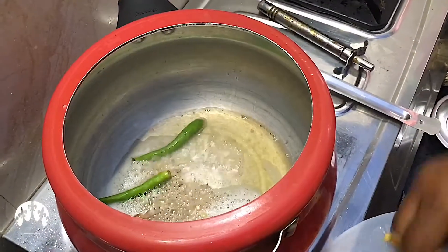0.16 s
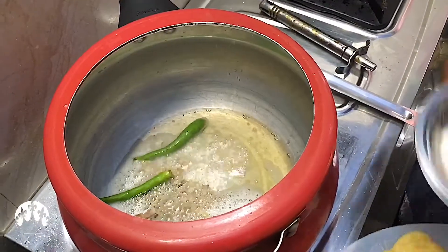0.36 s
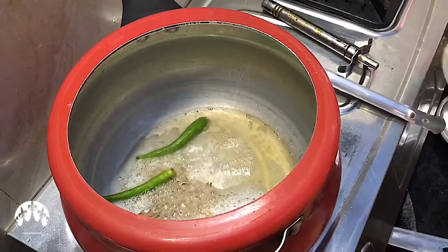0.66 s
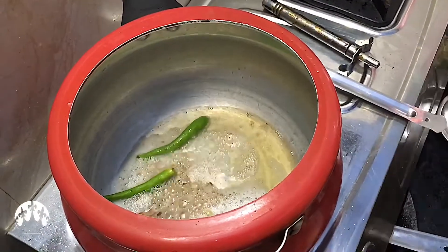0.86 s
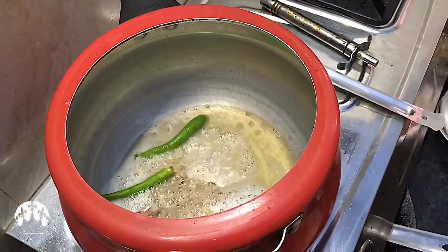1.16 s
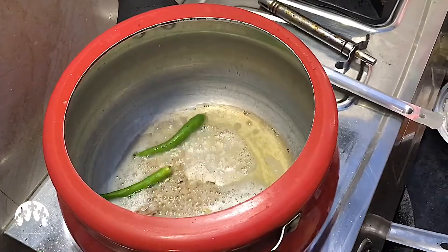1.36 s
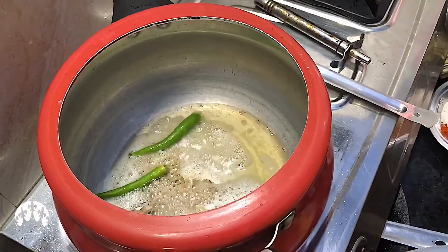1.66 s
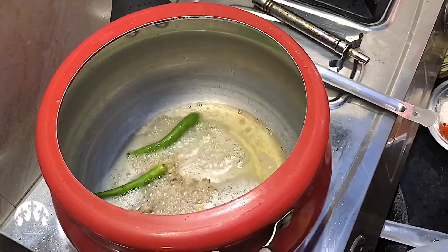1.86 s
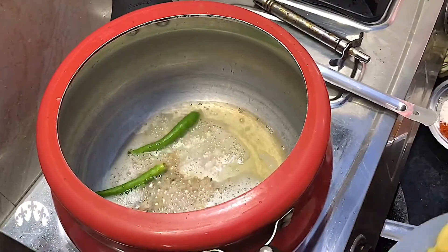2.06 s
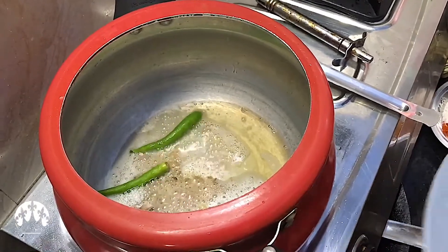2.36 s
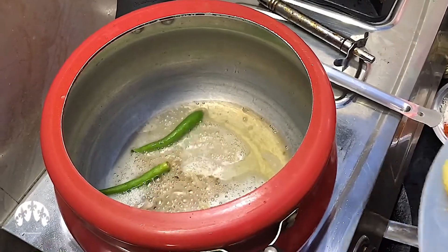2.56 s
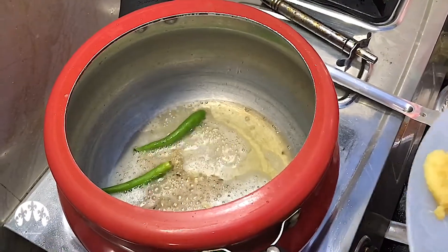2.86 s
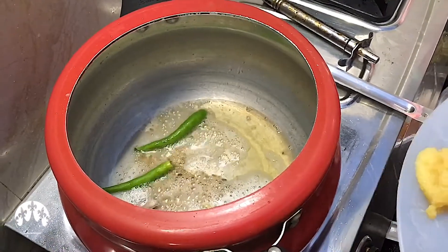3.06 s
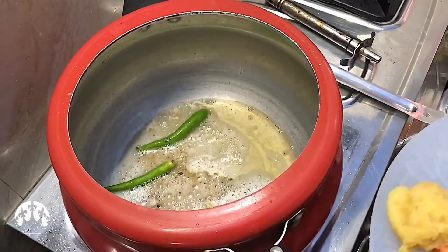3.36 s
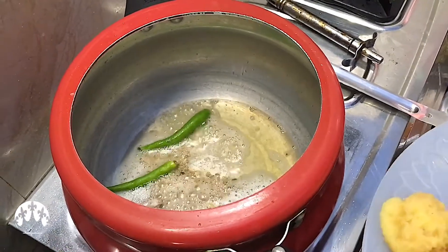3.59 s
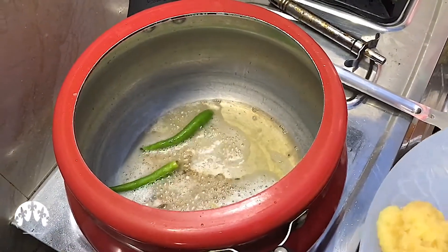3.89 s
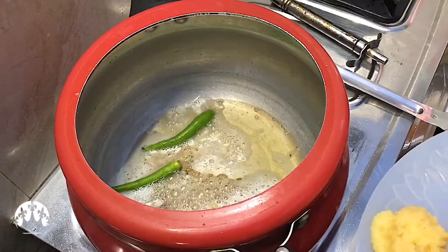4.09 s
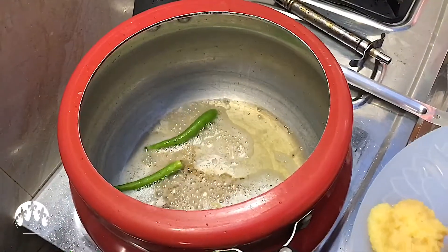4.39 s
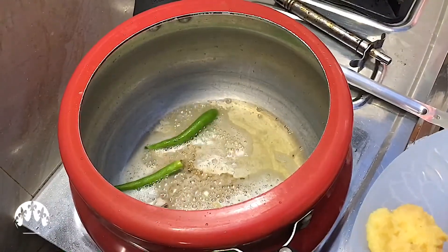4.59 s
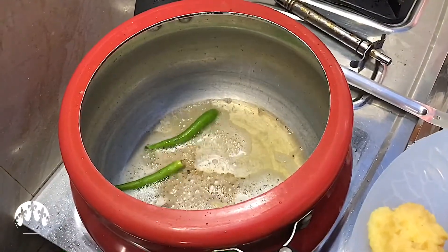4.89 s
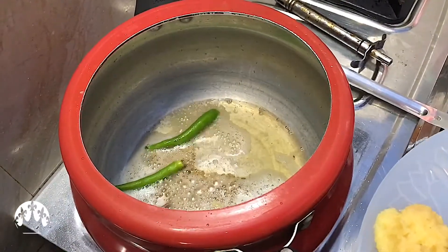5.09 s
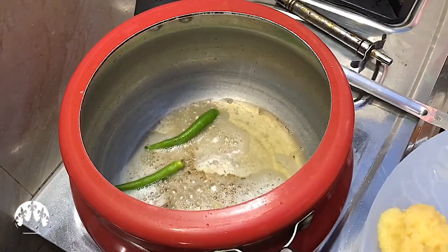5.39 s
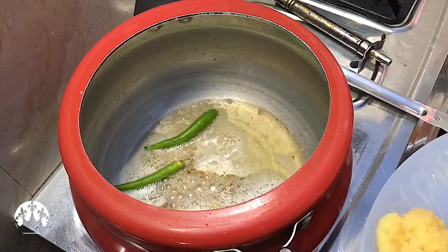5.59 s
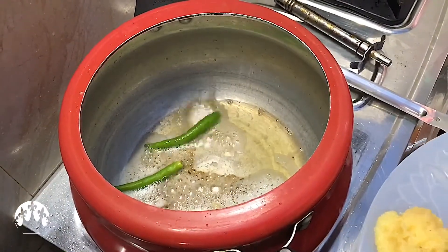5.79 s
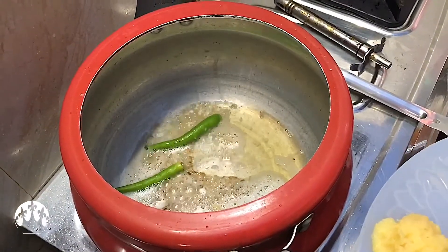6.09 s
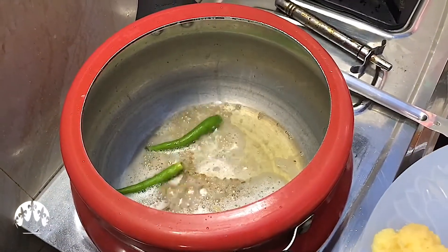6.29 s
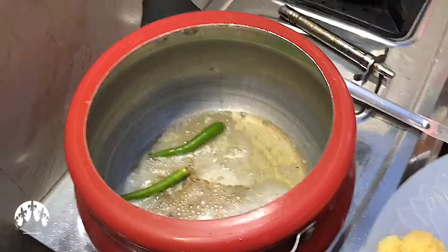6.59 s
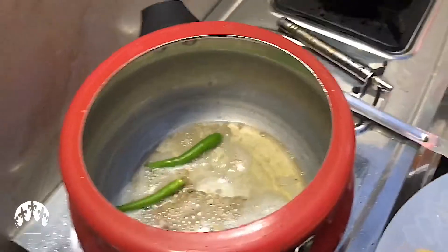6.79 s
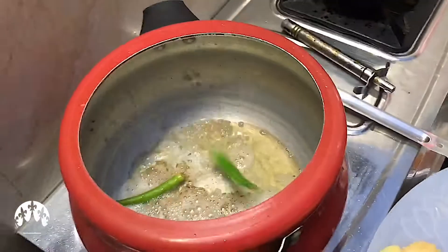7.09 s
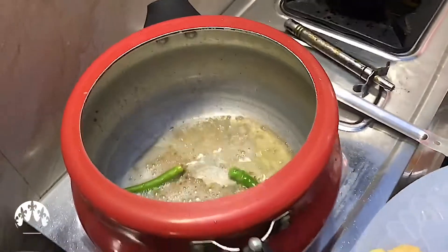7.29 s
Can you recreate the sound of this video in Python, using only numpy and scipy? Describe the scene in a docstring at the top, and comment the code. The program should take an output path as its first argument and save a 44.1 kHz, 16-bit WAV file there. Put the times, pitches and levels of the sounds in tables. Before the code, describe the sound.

Close, bright frying fizz full of snaps and round plips slowly dries out; a chilli pops with a tiny squeal, then another bursts and jumps.

```python
"""In a kitchen, green chillies and whole spices fry in hot oil in an open pressure cooker, heard just above the rim.
Boiling water makes a dense fizz of random clicks and small rings, with sharp noise spits and round plips,
thinning as the spices dry. Twice a chilli bursts: first steam squeals out and juice revives the sizzle, then it
jumps across the pot. Filters make the pot ring, a noise tail and low notes are the kitchen, a dish scrapes and
knocks, a gas flame murmurs, and the loudest pops overload."""
import sys
import numpy as np
from scipy import signal
from scipy.fft import rfft, irfft
from scipy.io import wavfile

SR = 44100
rng = np.random.default_rng(int(sys.argv[2]) if len(sys.argv) > 2 else 0)


def store_pcm(level_fs):
    """Save levels as 16-bit WAV."""
    pcm = np.round(np.clip(level_fs, -1, 1) * 32767).astype(np.int16)
    wavfile.write(sys.argv[1], SR, np.atleast_2d(pcm).T)


N = 328456
TIME = np.arange(N) / SR

# In all tables and settings, t60 is the time in seconds to fade by 60 dB.
# The two chilli bursts. Each row: start in seconds, level of the crack in dB, pitch in Hz, t60 in seconds,
# level of the puff in dB.
BURST_EVENTS = [(5.6505, -7, 1880, 0.018, -11), (6.832, -6.5, 1670, 0.048, -9.5)]
# Colour of the bright bubbling and cracks. Each row: frequency in Hz, relative level per Hz in dB.
FIZZ_COLOUR = [(300, -20), (800, -17), (1300, -11), (1800, -2), (2500, -0.5), (4000, 2.5), (6500, 5),
               (9000, 1), (11000, 0), (15500, -4.5)]
# Colour of the air pushed by spits and bursts. Each row: frequency in Hz, relative level per Hz in dB.
PUFF_COLOUR = [(25, -15), (60, -7.5), (120, -0.5), (220, -2.5), (400, 2.5), (600, -7.5), (800, -8.5),
               (1100, -12), (2500, -13), (8000, -58)]

# the water in the spices (1 at the start) boils away steadily, down to a last trace
DRY_S, LAST_WATER = 6.6, 0.19
# juice from the first burst: its share of water, how fast it spreads and how slowly it boils off
JUICE, JUICE_SPREAD_S, JUICE_LASTS_S = 0.24, 0.027, 1.8
# bubbles per second at full water; their number falls as this power of the water
SMALL_PER_S, LARGER_PER_S, RATE_POWER = 3300, 170, 0.85
# the treble is raised and the rest lowered by this many dB: always, at the start and after the juice
SETTLED_LIFT_DB, START_LIFT_DB, JUICE_LIFT_DB = 0.1, 1.5, 2.0
START_FINE_S, JUICE_FINE_S = 1.3, 1.8  # fading times of the last two lifts
CRISP_DB_PER_S = 0.36  # the lift grows as the spices dry
FLARE_DB, FLARE_S = 2.5, 0.15  # the sizzle starts with a short flare
FLIGHT_S, FLIGHT_DIP_DB = 0.215, -10.5  # the sizzle drops away while the second chilli is in the air
# lesser spits and plips: number per second, middle level at full water, power of the water that it follows
STRAY_PER_S, STRAY_DB, STRAY_POWER = 10, -12.5, 0.56


def from_db(db):
    """Turn decibels into a gain."""
    return 10 ** (np.asarray(db) / 20)


def rms_one(x):
    """Scale to an average (rms) strength of 1."""
    return x / np.sqrt(np.mean(x ** 2) + 1e-20)


def at_level(sound, db, size=176):
    """Scale a hit so that its first samples have the given rms level."""
    return sound * from_db(db) / np.sqrt(np.mean(sound[:size] ** 2) + 1e-20)


def at_hz(points, hz):
    """Read a table between its points, with frequency on a log scale."""
    f, value = np.transpose(points)
    return np.interp(np.log(np.maximum(hz, 1)), np.log(f), value)


def add(out, s, sound):
    """Mix a short sound in at time s."""
    i = max(0, round(s * SR))
    out[i:i + len(sound)] += sound[:max(0, N - i)]


def since(s):
    """Seconds since s, zero before it."""
    return np.maximum(TIME - s, 0)


def coloured(x, spectrum, size=4096):
    """Filter x to the shape of a spectrum, without delay (minimum phase) and with average power gain 1."""
    gain = rms_one(from_db(at_hz(spectrum, np.linspace(0, SR / 2, size // 2 + 1))))
    # folding the cepstrum forward in time gives the minimum-phase filter
    cepstrum = irfft(np.log(gain))[:size // 2]
    cepstrum[1:] *= 2
    response = irfft(np.exp(rfft(cepstrum, size)))
    return signal.oaconvolve(x, response)[:len(x)]


def band(x, hz, octaves, order=1):
    """Keep a band about hz."""
    low_edge = min(hz / 2 ** (octaves / 2), SR * .4)
    high_edge = min(hz * 2 ** (octaves / 2), SR * .45)
    sos = signal.butter(order, [low_edge, high_edge], "band", fs=SR, output="sos")
    return signal.sosfilt(sos, x + 1e-18)


def resonance(x, hz, octaves):
    """Ring at one pitch (two poles), with gain 1 at the peak."""
    r = np.exp(-np.pi * hz * (2 ** octaves - 1) / SR)
    top = (1 - r * r) / 2 * np.array([1, 0, -1])
    return signal.lfilter(top, [1, -2 * r * np.cos(2 * np.pi * hz / SR), r * r], x)


def clicks(per_s, spread_db, cap):
    """Random clicks, many small and a few large; the division evens out the power as the rate changes."""
    sizes = from_db(spread_db * np.minimum(rng.exponential(1, N), cap)) * rng.choice([-1, 1], N)
    return sizes * (rng.random(N) < per_s / SR) / np.sqrt(per_s)


def rupture(t60, snap, size=2048):
    """A film tears: one sharp snap in a spray of noise that dies away."""
    spray = rng.standard_normal(size) * from_db(-60 * TIME[:size] / t60)
    spray[1] += snap * rng.choice([-1, 1])
    return spray


def swelling(swell_s, size):
    """The rise and fall of a bubble's ring, strongest at swell_s seconds."""
    age = TIME[:size] / swell_s
    return age ** 2 * np.exp(-2 * age)


def water_left():
    """The spices dry out; the first burst wets the oil again."""
    age = since(BURST_EVENTS[0][0])
    juice = JUICE * (1 - np.exp(-age / JUICE_SPREAD_S)) * np.exp(-age / JUICE_LASTS_S)
    return np.maximum(1 - TIME / DRY_S, LAST_WATER) + juice


def fineness():
    """Treble lift in dB: fresh water boils in the finest bubbles, and drying spices turn slowly crisper."""
    age = since(BURST_EVENTS[0][0])
    start = START_LIFT_DB * np.exp(-TIME / START_FINE_S)
    juice = JUICE_LIFT_DB * (age > 0) * np.exp(-age / JUICE_FINE_S)
    return SETTLED_LIFT_DB + CRISP_DB_PER_S * TIME + start + juice


def tilted(x, lift_db, pivot_hz=8000):
    """Finer bubbles sound brighter: lower the part below the pivot and raise the rest."""
    low = signal.sosfilt(signal.butter(1, pivot_hz, fs=SR, output="sos"), x)
    return low * from_db(-lift_db) + (x - low) * from_db(lift_db)


def fizz(per_s, bubble_db=3.0, bubble_octaves=0.28, scatter_t60=0.013, count=20):
    """Tiny ticks, and small bubbles that each ring a few cycles at their own pitch."""
    ticks = rms_one(clicks(4 * per_s, spread_db=6.0, cap=5.5))
    born = clicks(per_s, spread_db=6.5, cap=3.1)
    dealt = rng.integers(0, 20, N)  # which pitch each bubble gets
    pitches = np.geomspace(1700, 15000, 20)
    bubbles = sum(band(born * (dealt == k), hz, bubble_octaves) for k, hz in enumerate(pitches))
    direct = ticks + from_db(bubble_db) * rms_one(bubbles)
    # each part of the pan reaches the ear by its own reflections off the steel wall
    place = rng.integers(0, count, N // 64 + 1).repeat(64)[:N]
    scattered = np.zeros(N)
    for k in range(count):
        path = rms_one(rupture(scatter_t60, snap=6.0, size=512))
        scattered += signal.oaconvolve(direct * (place == k), path)[:N]
    return rms_one(coloured(scattered, FIZZ_COLOUR))


def crackle(per_s, spread_db=2.0, t60=0.021, bubble_hz=4100, bubble_octaves=0.35, bubble_db=-1.0,
            swell_s=0.0026, count=2000, size=1024):
    """Larger bubbles give way one by one: some tear with a bright snap, others swell into a short rough ring."""
    snaps, rings = np.zeros((2, N))
    times, chance, kinds = rng.random((3, count))
    variations = np.clip(rng.standard_normal((count, 2)), -1.8, 1.8)
    for at, luck, kind, (pitch, loud) in zip(times, chance, kinds, variations):
        rate = per_s[int(at * N)]
        if luck > rate * N / SR / count:  # fewer of the candidates sound when the rate is low
            continue
        strength = from_db(spread_db * loud) / np.sqrt(rate)
        if kind < .5:
            add(snaps, at * N / SR, strength * rupture(t60, snap=6.9, size=size))
        else:
            hz = bubble_hz * 2 ** (bubble_octaves * pitch)
            ring = resonance(resonance(rng.standard_normal(size), hz, .35), hz, .35)
            add(rings, at * N / SR, strength * rms_one(ring) * swelling(swell_s, size))
    bright = rms_one(coloured(snaps, FIZZ_COLOUR))
    return rms_one(bright + from_db(bubble_db) * rms_one(rings))


def sizzle(water, busy, fizz_db=-18.0, crackle_db=-2.0):
    """Small and larger bubbles together, weaker and sparser as the water boils away."""
    frying = fizz(SMALL_PER_S * busy) + from_db(crackle_db) * crackle(LARGER_PER_S * busy)
    level = water * from_db(fizz_db + FLARE_DB * np.exp(-TIME / FLARE_S))
    return level * tilted(frying, fineness())


def gurgle(water, busy, level_db=-43.5, power=0.46, flare_db=13.0, flare_s=1.1):
    """The low side of the boiling: dull random thumps, strongest at the start."""
    # Colour of the thumps. Each row: frequency in Hz, relative level per Hz in dB.
    thump_colour = [(30, -37), (65, -8), (120, 1.5), (220, -2), (400, 0.5), (600, -5), (800, -11.5),
                    (1200, -10), (2300, -1), (8000, -87)]
    thumps = clicks(.25 * SMALL_PER_S * busy, spread_db=5.0, cap=1.65)
    level = water ** power * from_db(level_db + flare_db * np.exp(-TIME / flare_s))
    return level * rms_one(coloured(thumps, thump_colour))


def puff(db, t60=0.032, push_s=0.001, push_db=-7.0, push_from_db=-22.0):
    """The thump of displaced air and a deep push, which is relatively weaker in small puffs."""
    out = at_level(coloured(rupture(t60, snap=12.3), PUFF_COLOUR), db, size=500)
    deep_db = db + push_db + min(db - push_from_db, 0)
    return out + at_level(swelling(push_s, len(out)), deep_db, size=500)


def spit(db, hz, puff_db, t60=0.022, octaves=1.6, ring_db=-3.0, crack_db=-3.5, thump_db=-1.5):
    """A film tears at once: a broad ring about the pitch of its bubble, a crack and a puff."""
    tear = rupture(t60, snap=8.1)
    ring = at_level(band(tear, hz, octaves, order=2), db + ring_db)
    crack = at_level(coloured(tear, FIZZ_COLOUR), db + crack_db)
    return ring + crack + puff(puff_db + thump_db)


def plip(db, hz, swell_s=0.0015, octaves=0.51, ring_db=-2.5, crack_db=-9.5, thump_db=-38.0):
    """A round bubble swells into a narrow ring, with a softer crack and a slight puff."""
    tear = rupture(0.053, snap=18.0)
    drive = rng.standard_normal(len(tear)) * swelling(swell_s, len(tear))
    ring = at_level(band(drive, hz, octaves, order=2), db + ring_db)
    crack = at_level(coloured(tear, FIZZ_COLOUR), db + crack_db)
    return ring + crack + puff(db + thump_db)


def loud_spits_and_plips():
    """The steam bubbles that stand out of the sizzle: torn oil films and round rings."""
    # The loudest spits. Each row: start in seconds, level in dB, pitch in Hz, puff level in dB
    # (spit() trims the levels of its parts).
    loud_spits = [(0.0622, 0, 11400, -44), (0.074, -5, 6100, -32), (0.56, -2.5, 5670, -22),
                  (0.9827, -9.5, 2350, -30), (1.0735, -6.5, 5300, -34), (1.2364, -10, 8600, -34),
                  (1.3417, -7.5, 2600, -26), (1.3619, -11, 3570, -38), (1.3812, -8, 4170, -37),
                  (1.4356, -7, 5470, -33), (1.5463, -5, 8400, -30), (1.57, -7.5, 4300, -30),
                  (1.8258, -5.5, 5950, -34), (1.957, -7, 9000, -25.5), (1.9924, -7.5, 3640, -23.5),
                  (2.0046, -12, 3520, -32), (2.103, -11, 3540, -38), (2.1122, -13, 7770, -24),
                  (2.1434, -10, 9650, -37), (2.482, -10, 4060, -36), (2.7234, -8, 6960, -36),
                  (2.785, -6.5, 7500, -27.5), (3.0169, -9.5, 5760, -36), (3.1013, -14, 7910, -33),
                  (3.2441, -8, 7060, -35), (3.421, -12.5, 8700, -46), (3.4502, -11.5, 4600, -50),
                  (3.5188, -16, 3220, -38), (3.6272, -21.5, 3560, -30), (3.7992, -6, 5490, -30),
                  (3.8871, -2.5, 3700, -29), (3.8999, -8, 3600, -22.5), (3.9264, -11, 7280, -34),
                  (4.102, -10.5, 5200, -30.5), (4.303, -4, 10300, -24), (4.5676, -11, 6640, -38),
                  (4.6135, -12, 8560, -36), (4.6253, -8, 11600, -25.5), (4.6639, -12.5, 5000, -39),
                  (4.8099, -11, 4600, -48), (4.918, -10.5, 6000, -38.5), (5.3058, -14, 2900, -36),
                  (5.4568, -19, 10600, -43), (5.5647, -11, 10300, -43), (5.7767, -13, 4930, -35),
                  (5.8323, -13.5, 7490, -49), (5.8675, -12.5, 3200, -32.5), (5.933, -7, 4480, -29),
                  (6.0687, -13.5, 2300, -19), (6.146, -10, 8670, -21), (6.1592, -5, 6800, -36),
                  (6.1844, -9, 7100, -30), (6.2065, -10.5, 6470, -34), (6.2216, -15, 3460, -33),
                  (6.3142, -14.5, 4640, -19.5), (6.626, -4.5, 8800, -28), (6.6859, -6, 5100, -36),
                  (7.0483, -33, 5670, -40), (7.1874, -21, 8810, -34), (7.348, -13, 7140, -34.5)]
    # The loudest round bubbles. Each row: start in seconds, level in dB (plip() trims its parts), pitch in Hz.
    loud_plips = [(0.1505, -15.5, 2020), (0.2648, -10, 1850), (0.3381, -14, 2070), (0.7107, -10.5, 3600),
                  (0.724, -11.5, 4320), (1.582, -12, 2270), (1.637, -13.5, 2100), (2.1223, -9, 3660),
                  (2.2773, -11.5, 2510), (2.372, -12, 3630), (2.4148, -9, 2760), (2.6395, -10, 4030),
                  (2.6532, -10.5, 3320), (2.6786, -9.5, 3860), (2.69, -12.5, 5100), (2.882, -12, 3380),
                  (2.914, -14, 2540), (3.0052, -3, 3180), (3.1812, -12, 3270), (3.38, -11.5, 3400),
                  (3.532, -12.5, 2510), (3.949, -8.5, 6140), (4.0663, -11.5, 2340), (4.156, -13, 2350),
                  (4.5415, -14.5, 3200), (4.8844, -12.5, 3760), (5.128, -17, 3480), (5.1941, -12, 4400),
                  (5.25, -15.5, 3330), (5.2883, -12, 8040), (5.9935, -15, 3000), (6.3222, -12.5, 3330),
                  (6.3885, -12, 4000), (6.5502, -11.5, 3500), (7.3283, -17.5, 2170)]
    out = np.zeros(N)
    for s, db, hz, puff_db in loud_spits:
        add(out, s, spit(db, hz, puff_db))
    for s, db, hz in loud_plips:
        add(out, s, plip(db, hz))
    return out


def strays(water, spread_db=3.5, spit_share=0.3, spit_hz=8500, plip_hz=4000, pitch_octaves=0.35,
           thump_db=-33.0, count=200):
    """Lesser spits and plips at random, weaker as the water goes."""
    out = np.zeros(N)
    for k, (when, luck, kind, loud, pitch) in enumerate(rng.random((count, 5))):
        i = int((k + when) / count * N)
        if luck > STRAY_PER_S * N / SR / count:
            continue
        db = STRAY_DB + STRAY_POWER * 20 * np.log10(water[i]) + spread_db * (2 * loud - 1)
        detune = 2 ** (pitch_octaves * (2 * pitch - 1))
        if kind < spit_share:
            sound = spit(db, spit_hz * detune, db + thump_db)
        else:
            sound = plip(db, plip_hz * detune)
        add(out, i / SR, sound)
    return out


def pinpricks(water, per_s=14, level_db=-28.0, spread_db=2.0, hz=9500, octaves=1.4):
    """Now and then a droplet explodes in the open with one dry, needle-sharp tick."""
    ticks = rms_one(band(clicks(per_s, spread_db, cap=1.2), hz, octaves))
    return from_db(level_db) * water ** .5 * ticks


def mist(level_db=-19.5, hz=12800, octaves=0.81, hold_s=0.61, release_s=0.037, per_s=9000):
    """At first the last surface water flashes off as a very fine hiss, which stops quickly."""
    spray = rms_one(band(clicks(per_s, spread_db=9.0, cap=4.4), hz, octaves, order=2))
    return from_db(level_db) * spray * np.exp(-since(hold_s) / release_s)


def lull(fall_s=0.04):
    """Gain of the frying: it sinks as the chilli jumps and is back when it lands."""
    age = since(BURST_EVENTS[1][0])
    return from_db(FLIGHT_DIP_DB * (1 - np.exp(-age / fall_s)) * (age < FLIGHT_S))


def bursts(spray_db=-14.0, spray_t60=0.062, thump_t60=0.062, gulp_hz=1100, gulp_db=-23.5):
    """A chilli skin gives way: a crack, a hollow gulp, a heavy puff and a spray of oil."""
    out, t = np.zeros(N), TIME[:SR]
    for s, db, hz, t60, puff_db in BURST_EVENTS:
        crack = band(rupture(t60, snap=13.0), hz, 1.04)
        add(out, s, at_level(crack, db))
        gulp = np.sin(2 * np.pi * gulp_hz * t) * from_db(-60 * t / t60)
        add(out, s, from_db(gulp_db) * gulp)
        spray = band(rupture(spray_t60, snap=1, size=8192), 2 * hz, 5.7)
        add(out, s, at_level(spray, db + spray_db))
        thump = coloured(rupture(thump_t60, snap=33.0, size=8192), PUFF_COLOUR)
        add(out, s, at_level(thump, puff_db, size=500))
    return out


def squeal(octave_db=-3.5, size=1300):
    """Steam sets the edge of the split skin vibrating for a moment: a gliding, rough note and its octave."""
    # Each row: seconds after the first burst, pitch in Hz, level of the note in dB.
    glide = [(0, 7500, -30), (.002, 7150, 0), (.006, 6800, 2), (.011, 6600, -8), (.014, 6700, -24),
             (.017, 7000, -6), (.021, 7150, -4), (.023, 8300, -10), (.026, 8500, -45)]
    s, hz, db = np.transpose(glide)
    t = TIME[:size]
    rough_hz = np.interp(t, s, hz) * (1 + 0.061 * rng.standard_normal(size))
    phase = 2 * np.pi * np.cumsum(rough_hz) / SR
    note = np.sin(phase) + from_db(octave_db) * np.sin(2 * phase)
    out = np.zeros(N)
    add(out, BURST_EVENTS[0][0], from_db(np.interp(t, s, db)) * note)
    return out


def leak(s=6.825, hz=5000, level_db=-11.5, size=600):
    """Steam spurts from the chilli just before it jumps: a short swell of noise."""
    spurt = rms_one(band(rng.standard_normal(size), hz, 0.55) * swelling(0.012, size))
    out = np.zeros(N)
    add(out, s, from_db(level_db) * spurt)
    return out


def pot(x):
    """The air in the open pot rings on at its own pitches."""
    # Each row: pitch in Hz, width in Hz, lift in dB.
    air_modes = [(336, 42, 3.5), (444, 38, 9.5), (593, 81, 6), (1112, 25, 21), (1725, 370, 6),
                 (2030, 140, 10.5), (2350, 290, 2), (2873, 15, 7.5), (3401, 108, 8.5), (3760, 48, 6.5),
                 (4400, 41, 3.5), (5060, 48, 4.5), (8970, 280, 3.5)]
    out = x.copy()
    for hz, width, lift_db in air_modes:
        b, a = signal.iirpeak(hz, hz / width, fs=SR)
        out += (from_db(lift_db) - 1) * signal.lfilter(b, a, x)
    return out


def crockery(slide_hz=1700, slide_octaves=1.43, rumble_hz=150, rumble_db=-11.5, roughness=0.56):
    """A dish scrapes along the counter, which rumbles under it; soft knocks ring at one hollow note each."""
    # The sliding dish. Each row: time in seconds, level in dB.
    slide_levels = [(1.02, -70), (1.07, -28.5), (1.17, -25.5), (1.25, -43), (1.3, -29), (1.35, -21),
                    (1.41, -25), (1.48, -68)]
    # Knocks as crockery is moved beside the stove. Each row: start in seconds, level in dB before the soft
    # onset, pitch in Hz, t60 in seconds.
    knocks = [(2.545, -22, 618, 0.1), (3.632, -41, 804, 0.88), (4.156, -30.5, 181, 0.17),
              (6.425, -33.5, 249.5, 0.49)]
    s, db = np.transpose(slide_levels)
    slide_db = np.interp(TIME, s, db)
    slips = clicks(1500, spread_db=2.5, cap=3.0)
    scrape = rms_one(band(slips, slide_hz, slide_octaves, order=2))
    rumble = rms_one(band(slips, rumble_hz, 0.89, order=2))
    out = from_db(slide_db) * (scrape + from_db(rumble_db) * rumble)
    t = TIME[:SR]
    for s, db, hz, t60 in knocks:
        rough = rms_one(band(rng.standard_normal(SR), hz, 0.26))
        note = np.sin(2 * np.pi * hz * t) + roughness * rough
        add(out, s, from_db(db - 60 * t / t60) * note * (1 - np.exp(-t / 0.0077)))
    return out


def kitchen(x, wet_db=-11.5, size=30000):
    """Echoes blur into a tail of noise whose bands fade at their own speeds."""
    # Each row: frequency in Hz, t60 in seconds.
    fading = [(80, 1), (160, 0.28), (400, 0.22), (1500, 0.28), (5000, 0.21), (14000, 0.21)]
    t, tail = TIME[:size], np.zeros(size)
    for hz in 62.5 * 2. ** np.arange(9):
        noise = band(rng.standard_normal(size), hz, 0.95, order=2)
        tail += noise * from_db(-60 * t / at_hz(fading, hz))
    tail *= 1 - np.exp(-t / 0.00043)
    tail /= np.sqrt(np.sum(tail ** 2))
    return x + from_db(wet_db) * signal.oaconvolve(x, tail)[:N]


def boom(levels_db=(-32.0, -20.0)):
    """The bursts set the low notes of the kitchen ringing, each a fading sine."""
    # Each row: pitch in Hz, relative level in dB, t60 in seconds.
    modes = ((118, 0, .85), (127, -7, .7), (143, -2, .55), (178, -1, .45), (62, -3, .2), (235, -3, .35),
             (315, -7, .35))
    t, out = TIME[:SR], np.zeros(N)
    ringing = sum(from_db(db - 60 * t / t60) * np.sin(2 * np.pi * hz * t) for hz, db, t60 in modes)
    for burst, db in zip(BURST_EVENTS, levels_db):
        add(out, burst[0], from_db(db) * ringing * (1 - np.exp(-t / 0.022)))
    return out


def flame(level_db=-53.5):
    """The gas flame murmurs: steady noise, strongest around 400 Hz."""
    # Each row: frequency in Hz, relative level per Hz in dB.
    flame_colour = [(25, -48), (70, -5), (130, -12), (400, 17), (800, -30), (3000, -35)]
    return from_db(level_db) * coloured(rng.standard_normal(N), flame_colour)


def scene():
    """The water left drives the frying, which sounds through the pot and the kitchen, over the flame."""
    water = water_left()
    busy = water ** RATE_POWER
    frying = sizzle(water, busy) + gurgle(water, busy) + strays(water) + pinpricks(water) + mist()
    in_pot = pot(lull() * frying + loud_spits_and_plips() + bursts() + leak())
    in_kitchen = kitchen(in_pot + squeal() + crockery())
    return (in_kitchen + boom() + flame())[None]


def record(dry, ceiling=0.91, lopsided=0.15, low_cut_hz=50, high_cut_hz=16000):
    """The loudest peaks flatten, more on one side, which leaves a low bump; bottom and top are cut."""
    clipped = dry / (1 + (dry / ceiling) ** 4) ** (1 / 4)
    clipped = clipped + lopsided * clipped ** 4
    low_cut = signal.butter(2, low_cut_hz, "high", fs=SR, output="sos")
    high_cut = signal.ellip(12, .1, 80, high_cut_hz, fs=SR, output="sos")
    return signal.sosfilt(high_cut, signal.sosfilt(low_cut, clipped))


dry = scene()
out = record(dry)
store_pcm(out)
```